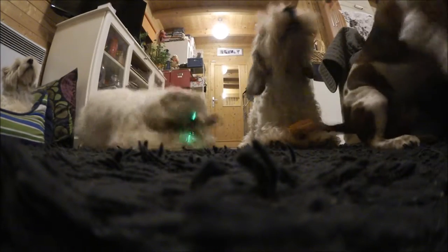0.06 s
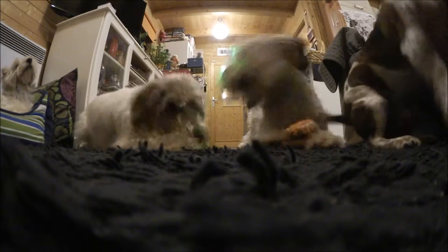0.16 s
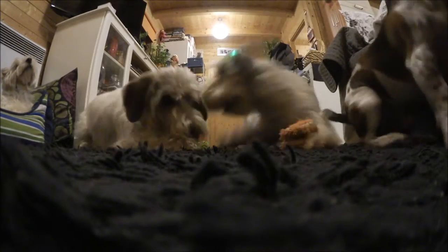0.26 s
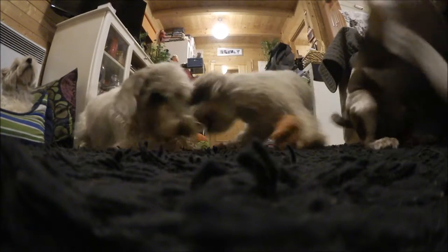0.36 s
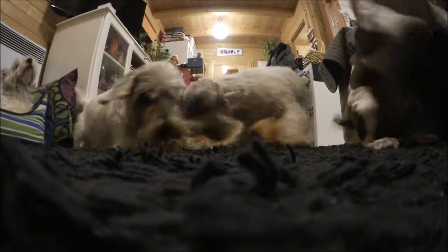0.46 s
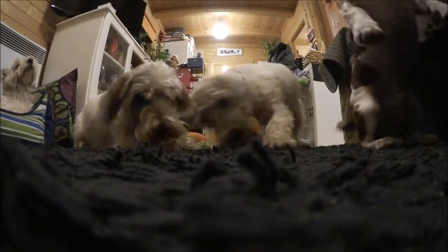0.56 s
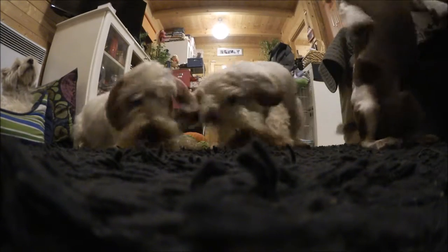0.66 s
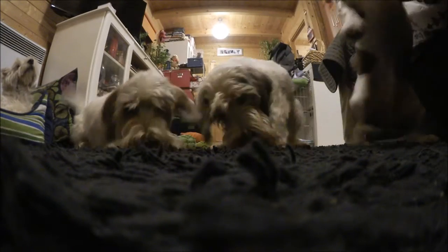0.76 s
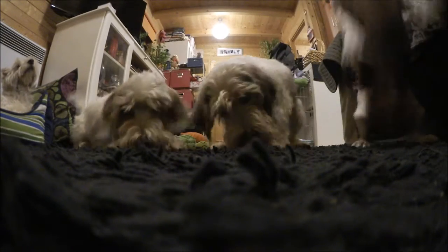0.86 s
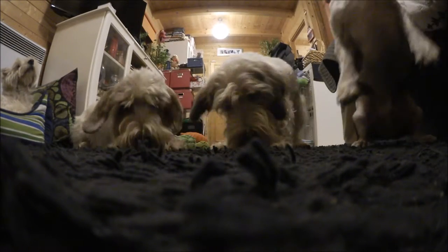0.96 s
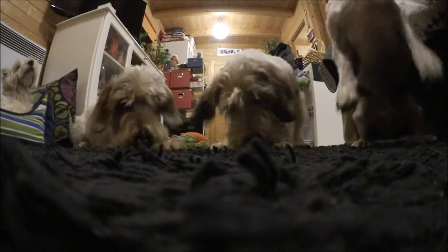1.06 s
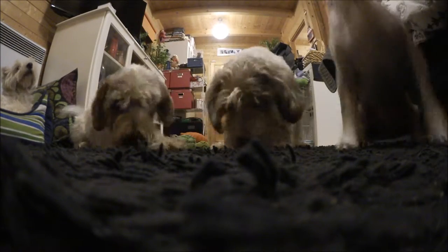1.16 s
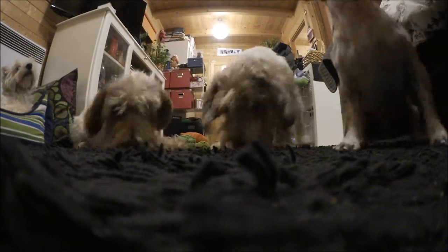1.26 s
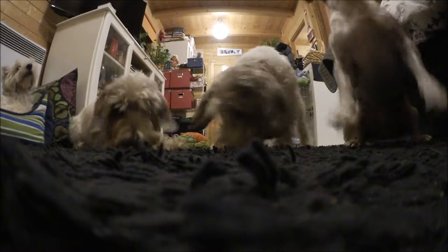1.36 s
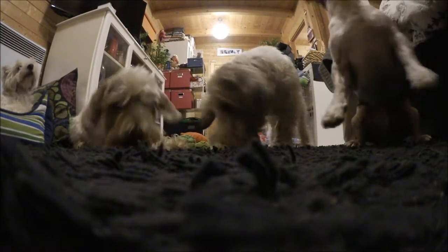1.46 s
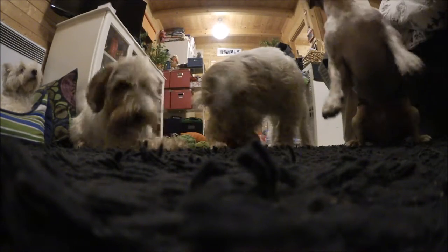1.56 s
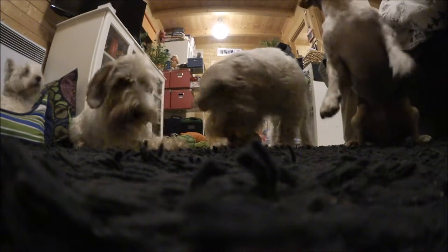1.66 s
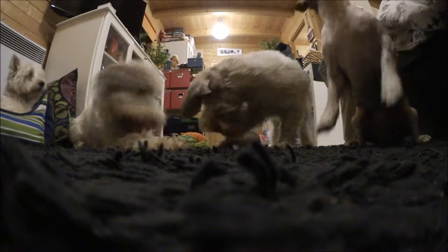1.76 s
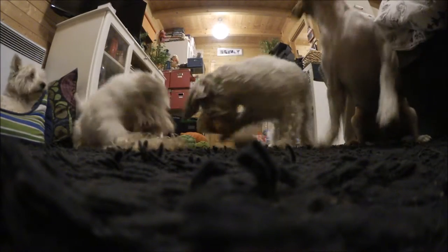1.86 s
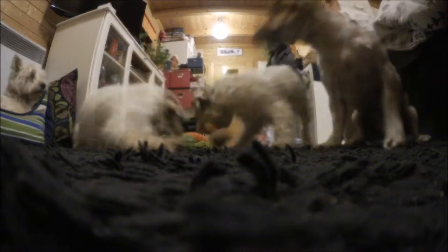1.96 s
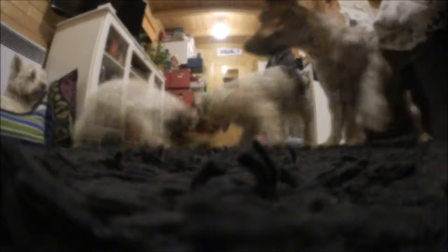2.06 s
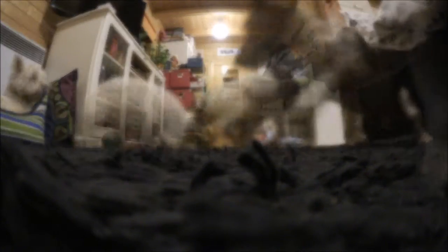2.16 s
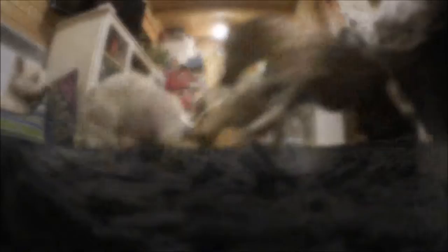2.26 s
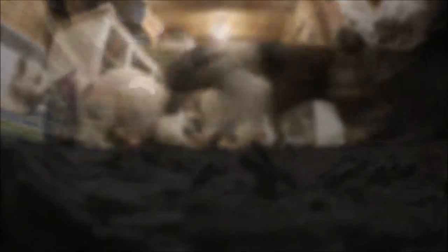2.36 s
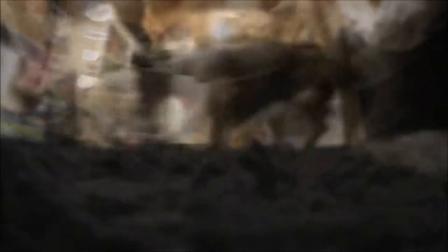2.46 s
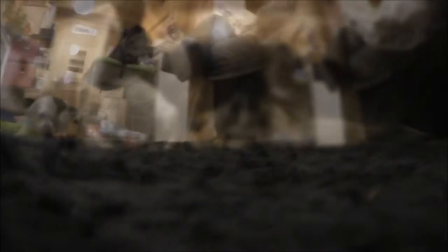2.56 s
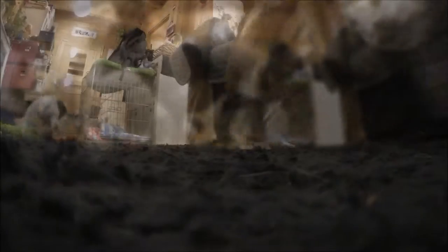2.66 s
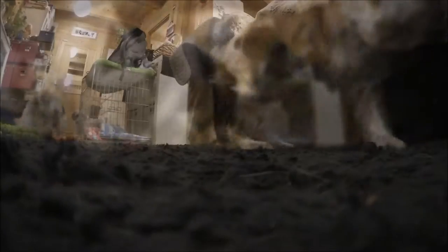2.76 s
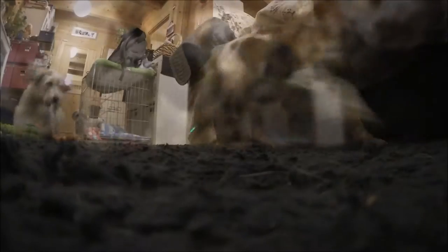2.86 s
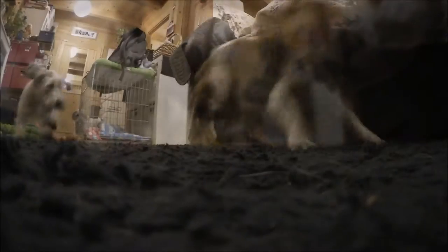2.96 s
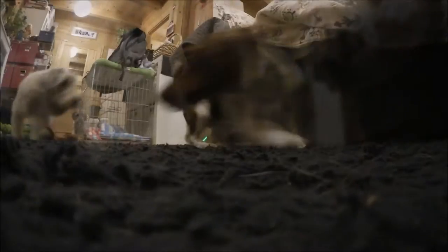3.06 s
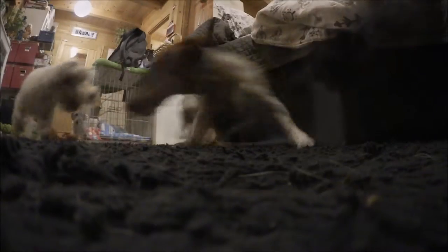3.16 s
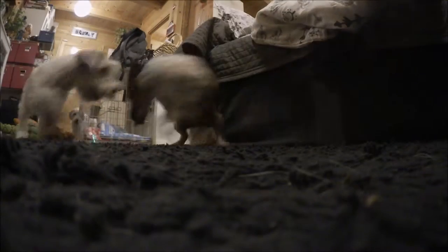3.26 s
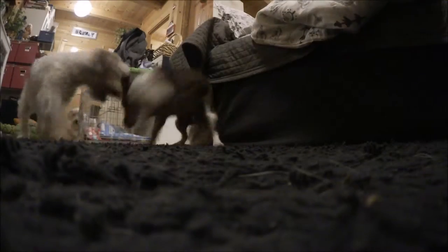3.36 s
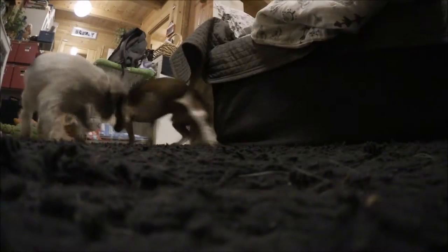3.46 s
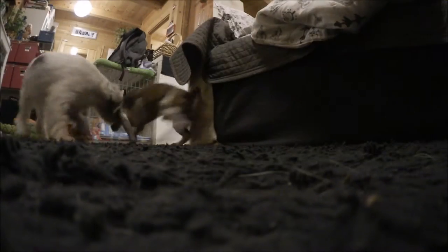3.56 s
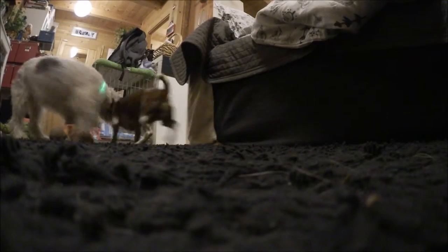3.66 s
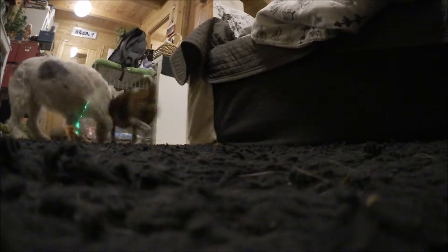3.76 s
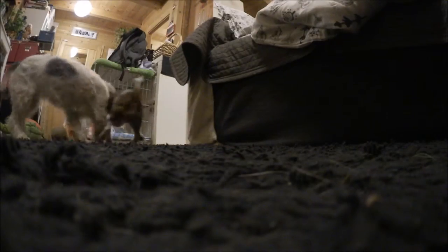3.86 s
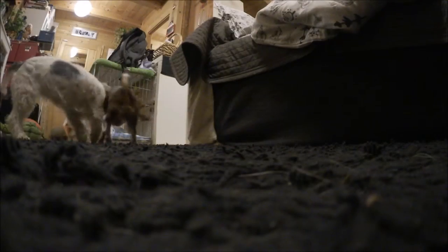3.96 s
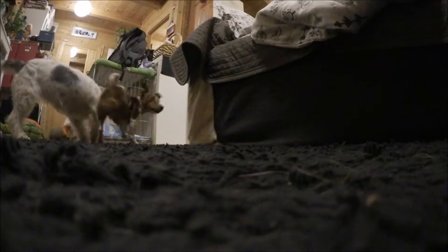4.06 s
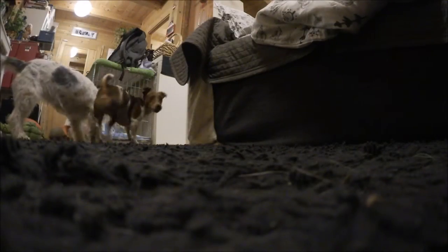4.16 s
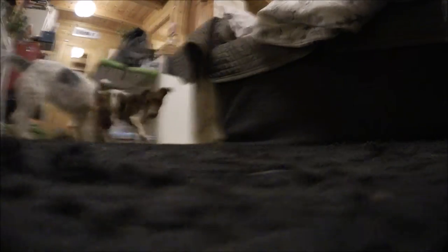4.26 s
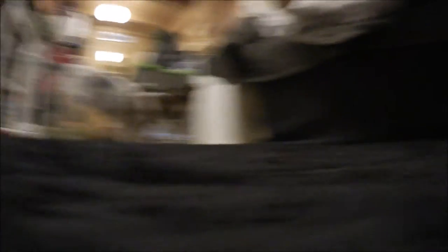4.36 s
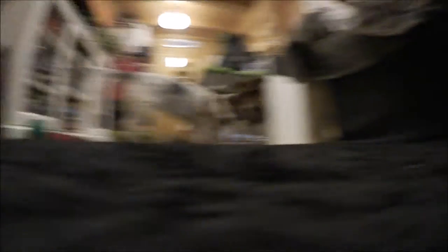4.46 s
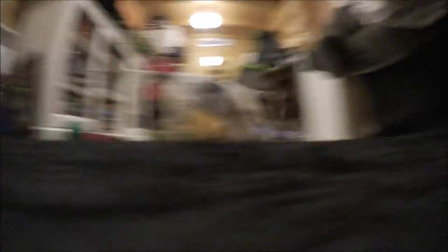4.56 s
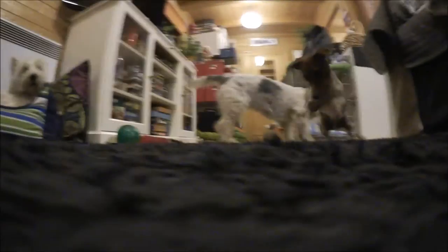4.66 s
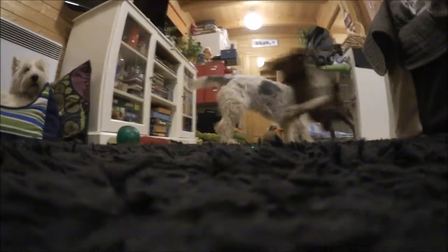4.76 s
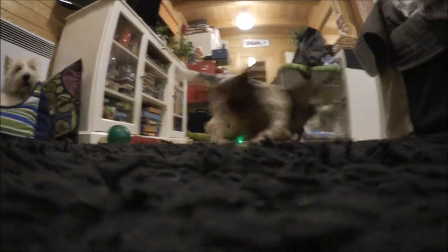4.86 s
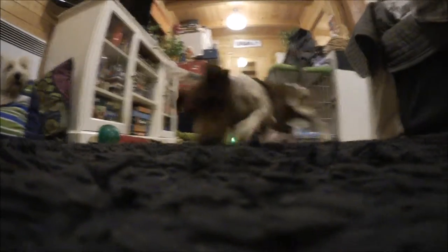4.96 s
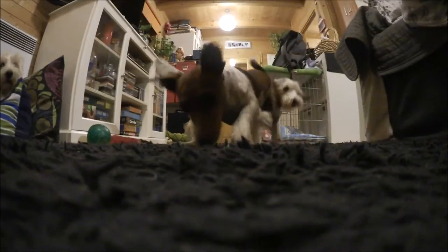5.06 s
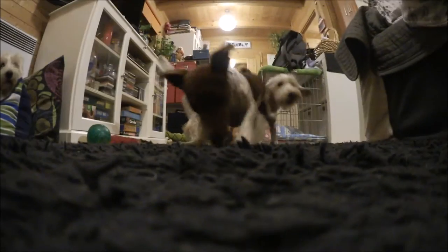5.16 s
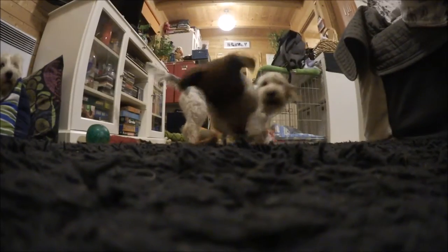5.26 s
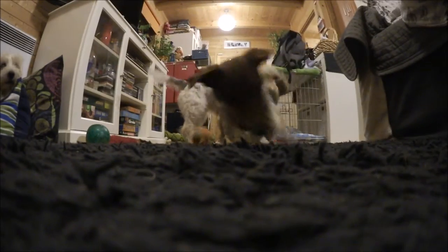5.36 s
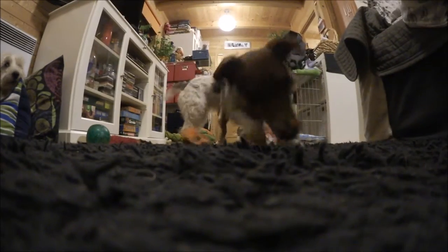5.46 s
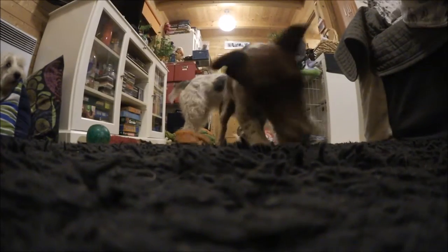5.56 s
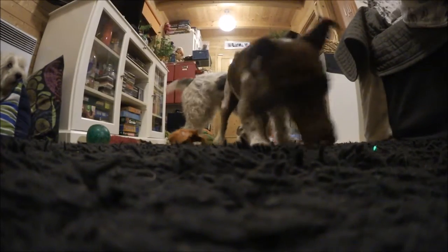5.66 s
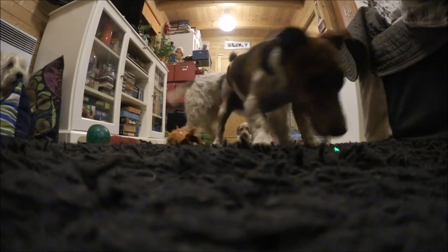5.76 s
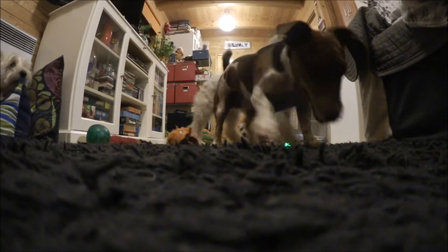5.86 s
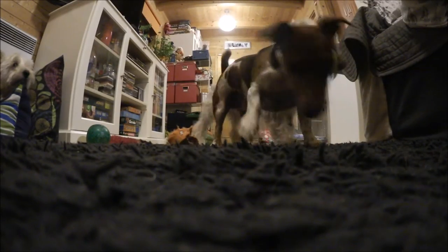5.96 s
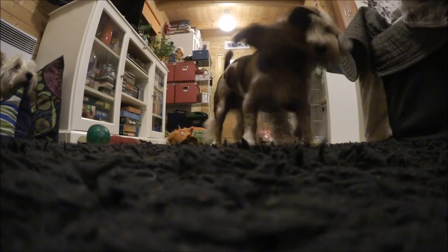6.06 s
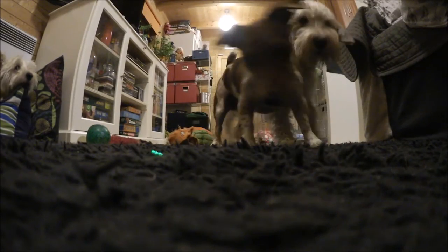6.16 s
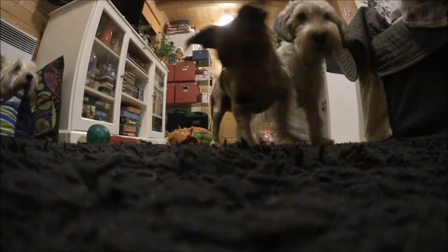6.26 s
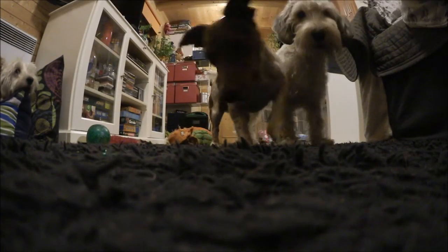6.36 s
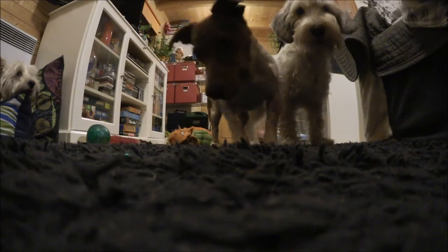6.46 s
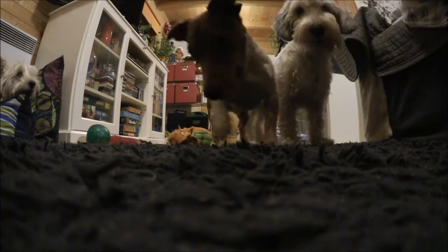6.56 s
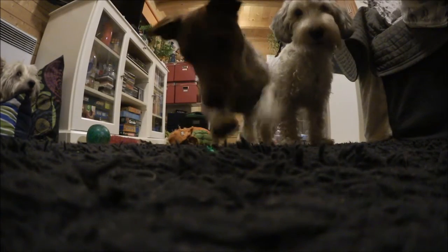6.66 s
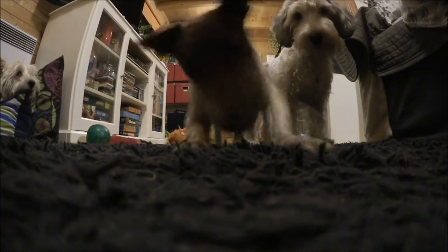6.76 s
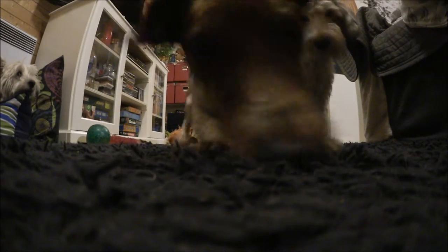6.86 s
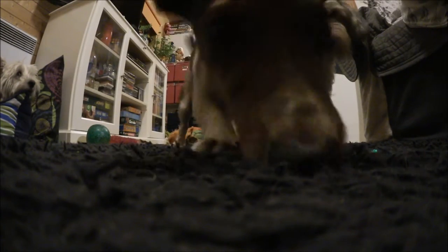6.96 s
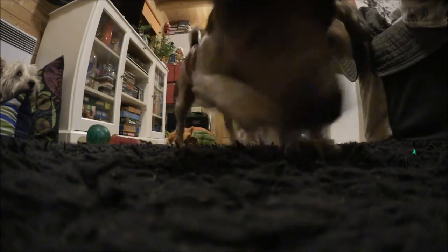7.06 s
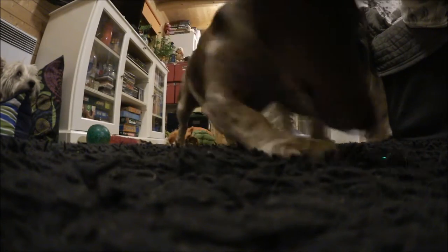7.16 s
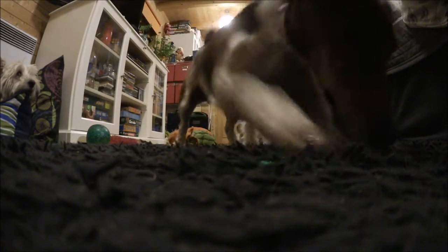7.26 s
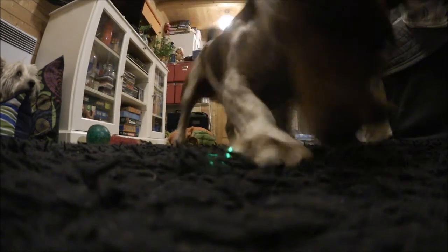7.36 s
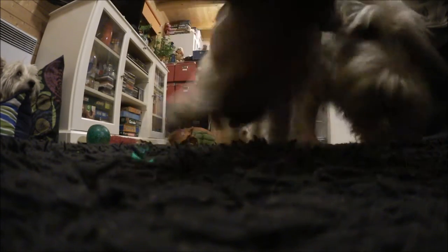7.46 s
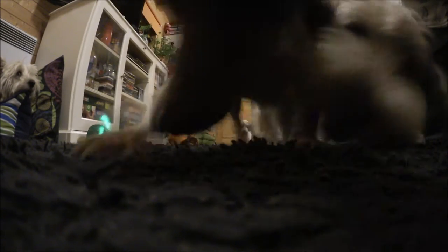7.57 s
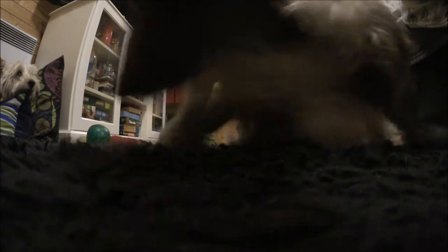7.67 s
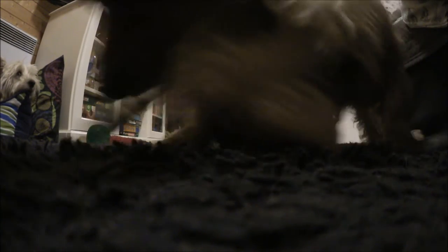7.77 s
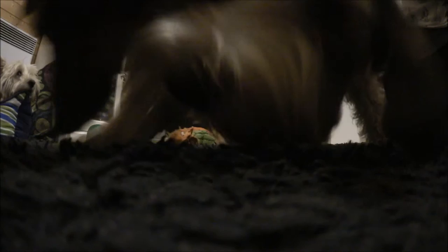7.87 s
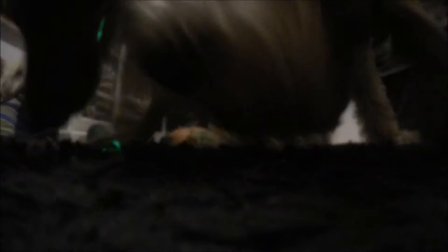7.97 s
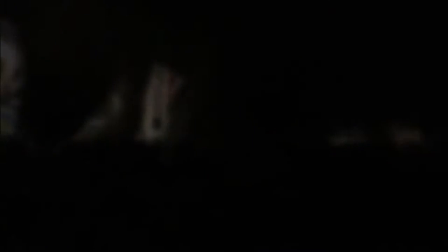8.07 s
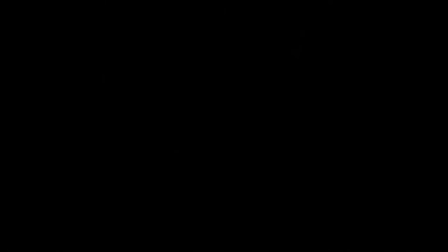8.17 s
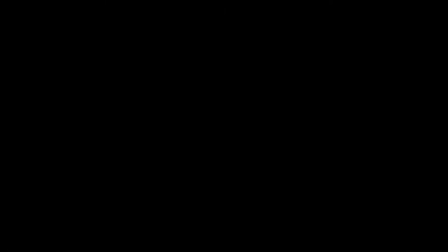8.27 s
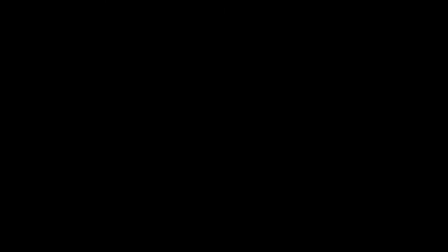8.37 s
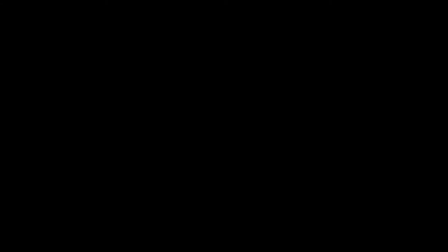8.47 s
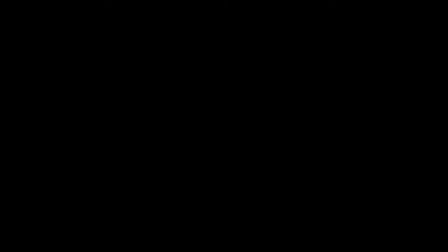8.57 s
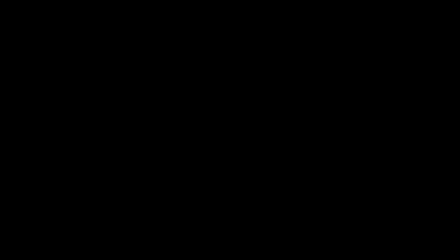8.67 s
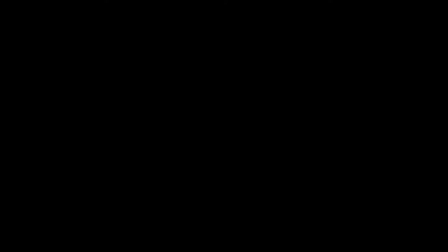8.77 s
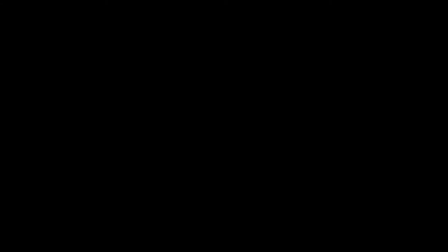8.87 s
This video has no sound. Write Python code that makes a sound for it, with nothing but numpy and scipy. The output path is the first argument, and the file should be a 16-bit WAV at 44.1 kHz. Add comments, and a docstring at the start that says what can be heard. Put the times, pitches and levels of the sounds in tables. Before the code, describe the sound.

A low microphone on a shaggy rug hears quiet air in a short, dull wooden room. A dark paw thump opens at 0 s, then soft shuffling, pressing feet and small hollow toy knocks run to about 2 s. From 2.2 to 2.5 s several hard thuds arrive with snapping pile, bright ticks and a harsh, ringing drag of the plastic case. Movement settles; a muted knock falls near 3.5 s, and a faint brushing of the case runs from 4.3 to 5 s. A firm thump at 4.9 s leads to short scuffs and claw snaps until 5.5 s. Very faint, hoarse high squeaks, perhaps a dog's, dot 5.6-6.3 s. Scuffing returns at 6.6 s, with a sharp snap near 6.9, and grows rough and close from 7.4 s. At 8.1-8.3 s snaps, ticks, knocks, thuds and case rubbing crowd together; sound stops at 8.5 s.

```python
"""Small dogs chase a light spot over a shaggy rug in a wood-lined room, heard from floor level.
Over quiet air, light shuffling noise swells and settles; paws thump the floor as dying low notes.
Feet scuff as grainy noise, jaws knock on a toy, claws pluck loops in short snaps, hairs tick on the case.
From 2.3 s, 4.3 s and 8.1 s the ringing microphone case is dragged or brushed with coloured noise.
Faint, hoarse high squeaks, perhaps a dog's, come from 5.6 to 6.3 s; the feet end close by, all stops at 8.52 s."""
import sys
import numpy as np
from scipy import signal
from scipy.fft import rfft, irfft, next_fast_len
from scipy.io import wavfile

SR = 44100
rng = np.random.default_rng(int(sys.argv[2]) if len(sys.argv) > 2 else 0)


def bounce(signal):
    """Save signal as a 16-bit WAV file at the path given by the first command-line argument."""
    frames = np.transpose(np.atleast_2d(signal))
    limited = np.clip(frames, -1, 1)
    pcm = np.round(limited * 32767).astype(np.int16)
    wavfile.write(sys.argv[1], SR, pcm)


N = 392931

# Table levels are relative: the functions below add their own trims.
# paws landing: [t/s, level/dB, boom f/Hz, floorboard level against boom/dB]
PAW_LANDINGS = [(0.022, -1.5, 123, -14), (0.303, -22.5, 150, -22), (0.632, -24.5, 148, -18),
                (1.38, -24.5, 134, -12), (1.999, -13.5, 157, -15.5), (2.185, -0.5, 256.6, -8),
                (2.281, 0.5, 261.4, -8.5), (2.365, -8.5, 199, -19), (2.426, -6, 136, -10.5),
                (2.517, -15.5, 177, -19), (2.775, -20, 199.6, -14.5), (2.928, -22.5, 172, -15),
                (3.147, -22, 185, -12), (3.385, -26, 172, -19), (3.61, -29, 171, -23),
                (3.685, -29, 199, -15), (4.14, -25, 132, -11.5), (4.635, -23, 167, -10),
                (4.86, -1, 152.5, -11), (4.911, -13, 149, -18), (5.187, -28, 161, -20),
                (6.784, -12, 153, -15.5), (7.24, -20.5, 121, -19), (7.347, -13, 215, -14),
                (8.214, -8, 277, -5.5), (8.267, -6, 183, -12.5), (8.311, -7.5, 182, -9)]
# jaws and toy knocking: [t/s, level/dB, hollow f/Hz, clack level against body/dB]
TOY_KNOCKS = [(0.171, -21, 358, -10), (0.383, -23.5, 1170, -5), (0.704, -15.5, 448, -6.5),
              (0.86, -28.5, 1190, -16), (0.922, -14, 855, -9), (1.406, -17.5, 447, -9.5),
              (1.606, -11.5, 333, -12.5), (2.049, -21, 1166, -15), (3.458, -9.5, 550, -24),
              (3.859, -24, 356, -20.5), (4.774, -18, 248, 0.5), (8.128, -15, 670, -18.5),
              (8.219, -9, 700, -25), (8.27, -3.5, 254, -13.5), (8.315, -9, 745, -19)]
# claws plucking loops of the pile: [t/s, level/dB]
CLAW_SNAGS = [(0.174, -25.5), (2.2791, -7), (2.2962, -8.5), (2.4015, -14), (2.836, -22.5), (3.1652, -20),
              (3.289, -21.5), (3.458, -15.5), (4.9452, -15.5), (4.9676, -14), (5.2607, -9), (5.2861, -12.5),
              (5.4474, -9.5), (5.5233, -26), (5.5398, -17.5), (6.7285, -19.5), (6.871, -3.5), (7.3838, -13),
              (7.4293, -8.5), (7.5403, -22.5), (7.6825, -4.5), (7.9159, -3), (8.1091, -17.5), (8.1559, -11),
              (8.1708, -1), (8.1772, -1)]
# hairs and tufts flicking the case: [t/s, level/dB]
HAIR_FLICKS = [(0.173, -28), (2.3142, -2.5), (2.3296, 3), (2.3417, -7), (2.3994, -8.5), (2.889, -19.5),
               (6.8878, -16), (7.095, -33), (7.5393, -31), (7.9418, -19.5), (7.9851, -13), (8.0022, -16),
               (8.0476, -15), (8.2054, -8.5), (8.2322, -6), (8.2725, 3.5), (8.4636, -15.5)]
# paws and fur stroking the pile: [peak t/s, length t/s, rasp level/dB, pressure level/dB]
PILE_STROKES = [(0.212, 0.073, -41.5, -1), (0.741, 0.1, -34, 4.5), (0.44, 0.19, -47.5, -4),
                (.98, 0.29, -42, -1), (1.223, 0.14, -41.5, -3), (1.435, .12, -37, 6),
                (1.537, 0.29, -44.5, 5.5), (2.1, 0.43, -37.5, -8.5), (2.29, 0.035, -16.5, 2.5),
                (2.65, 0.13, -39.5, -2), (3.013, 0.092, -34.5, -13.5), (3.169, 0.053, -32, 6.5),
                (3.425, 0.32, -41, -4.5), (4.164, .1, -50, 15), (4.931, 0.19, -32.5, 4.5),
                (5.188, 0.11, -42.5, -9), (5.284, .075, -26, 1.5), (5.453, 0.074, -25.5, -3),
                (5.543, 0.061, -33, 1.5), (6.63, 0.075, -35.5, -10), (6.789, 0.17, -30, -3.5),
                (6.882, 0.044, -17, 1), (6.942, 0.069, -27.5, -6.5), (7.143, .16, -38.5, 0),
                (7.29, 0.095, -32, -2.5), (7.375, 0.08, -28.5, 1), (7.456, 0.06, -12.5, -1),
                (7.698, 0.13, -14, -2.5), (7.762, 0.012, -32.5, -17), (7.832, 0.035, -28, 1.5),
                (7.928, 0.07, -16.5, 1), (8.009, 0.067, -28.5, 1.5), (8.116, .054, -19, 0),
                (8.184, 0.087, -13, 0), (8.312, 0.062, -17, -2.5), (8.425, 0.07, -41, -0.5),
                (8.467, .022, -28, 6)]
# case dragged or brushed: [start t/s, length t/s, level/dB, fastest moment as a share of the length]
CASE_DRAGS = [(2.279, 0.069, -21, 0.29), (2.37, 0.045, -23, 0.31), (2.397, 0.21, -34, 0.36),
              (4.276, 0.775, -41.5, 0.36), (8.068, 0.3, -37.5, 0.34)]
# faint high squeaks: [start t/s, middle f/Hz, level/dB]
FAINT_SQUEAKS = [(5.59, 2740, -47), (5.858, 2730, -51), (6.068, 2750, -55), (6.25, 2700, -57),
                 (6.307, 2810, -51)]
# floorboard notes, varied a little at each landing: [f/Hz, level/dB, time to fall 60 dB t/s]
FLOORBOARDS = [(245.5, -4.5, 0.1), (386, 4, 0.04), (424.5, -5.5, 0.064), (519, -8.5, 0.045),
               (809, -16.5, 0.046)]
# resonances of the microphone case: [f/Hz, width f/Hz, level/dB]
CASE_RINGS = [(2400, 280, -6), (2990, 350, 6.5), (4220, 300, -6), (5100, 230, -7), (6200, 300, -22.5)]
# spectrum of a paw's weight on the pile: [f/Hz, level/dB per Hz]
WEIGHT_SPECTRUM = [(25, -40.5), (60, -12), (110, 1.5), (180, 2.5), (330, -0.5), (600, -12), (1000, -23),
                   (2000, -42)]
# spectrum of the rasping pile: [f/Hz, level/dB per Hz]
RASP_SPECTRUM = [(200, -28), (500, 5), (900, 2.5), (1600, 1), (2700, -2), (3800, -11.5), (6000, -32),
                 (12000, -31)]
# spectrum of hissing single hairs: [f/Hz, level/dB per Hz]
HISS_SPECTRUM = [(2000, -18), (3500, 11), (6000, 4), (8500, -0.5), (11000, -4.5), (13000, -11.5),
                 (16000, -16.5)]
# spectrum of tufts rubbing the case, before it rings: [f/Hz, level/dB per Hz]
FRICTION_SPECTRUM = [(300, -24), (1000, 3), (2000, 4), (3300, -1), (5000, -5.5), (8000, -7), (11000, -8.5),
                     (13000, -13.5), (16000, -28.5)]
# spectrum of light steps: [f/Hz, level/dB per Hz]
STEP_SPECTRUM = [(25, -33), (55, -15.5), (90, -2.5), (160, 0.5), (260, -3.5), (420, -7), (700, -14.5),
                 (1500, -38.5)]
# spectrum of rubbing fur: [f/Hz, level/dB per Hz]
FUR_SPECTRUM = [(250, -19.5), (550, -6), (1200, -0.5), (2600, -5), (3600, -19), (7000, -18), (14000, -29.5)]
# spectrum of the steady air: [f/Hz, level/dB per Hz]
AIR_SPECTRUM = [(18, -44), (30, -19), (98, -3), (266, -4.5), (461, 1.5), (780, -7.5), (2610, -9.5),
                (7270, -16), (13700, -23), (16000, -33.5)]
# bouts of shifting about: [start t/s, end t/s, level/dB]
SHUFFLE_BOUTS = [(0, 1.74, -49), (2.03, 3.2, -39), (3.35, 3.57, -51), (4.601, 5.45, -52.5),
                 (6.72, 7.04, -45.5), (7.549, 8.2, -42.5)]
# how near the dogs are to the microphone: [t/s, closeness 0-1]
NEARNESS = [(2.2, 0.1), (2.38, 1), (2.7, 0), (6.9, 0.03), (7.45, 0.5), (8.5, 0.66)]
# their side as they cross in front of it: [t/s, left level against right/dB]
SIDE = [(6.9, -1), (7.42, -2.5), (7.7, 2), (7.93, 4), (8.15, -0.5), (8.5, -5)]

AIR_DB = -57
ROOM_T60_S, WALL_CUT_HZ = 0.17, 6000
STOP_S, CUTOFF_HZ = 8.52, 16800
T = np.arange(N) / SR
HIT = T[:SR // 4]   # time within one blow, s
# every stroke swells and fades about alike, in proportion to its length
STROKE_S, SWELL_S, SWELL_GROWTH = 0.069, 0.037, 0.99
# pressing harder adds weight and smothers the hair hiss; closeness brings the hiss out
HAIR_DB, HAIR_LOSS_DB_PER_DB, HAIR_NEAR_DB = -21.5, 1.22, 7.5
# how fast a bout builds and dies; what still stirs at rest
SETTLE_DB_PER_S, FIDGET_DB = 86, -62
# loss a whole length away from the fastest moment; how sharply a drag starts and stops
DRAG_EASE_DB, DRAG_EDGE_DB_PER_S = 19, 1501
SQUEAK_S = 0.039
PAW_NEAR_DB = 9   # extra shudder from a paw landing right beside the case


def from_db(db):
    """Turn decibels into a gain."""
    return 10 ** (np.asarray(db) / 20)


def rms_one(x):
    """Scale to an average strength (rms) of 1."""
    return x / np.sqrt(np.mean(x ** 2) + 1e-20)


def peak_one(x):
    """Scale the highest peak to 1."""
    return x / (np.abs(x).max() + 1e-20)


def add(track, s, sound):
    """Mix a sound into a track at time s."""
    at = max(0, int(s * SR))
    track[..., at:at + sound.shape[-1]] += sound[..., :N - at]


def in_time(curve):
    """A control curve at every sample."""
    return np.interp(T, *np.transpose(curve))


def outside(start, end):
    """Seconds before a start or after an end; 0 in between."""
    return np.maximum(np.maximum(start - T, T - end), 0)


def band(x, low_hz, high_hz, order=2):
    """Keep only the pitches between two limits."""
    limits = [low_hz, min(high_hz, .45 * SR)]
    return signal.sosfilt(signal.butter(order, limits, "band", fs=SR, output="sos"), x)


def colour(x, spectrum):
    """Filter a steady sound through a spectrum with sloping outer edges; rms 1."""
    size = next_fast_len(N)
    hz, db = np.transpose(spectrum)
    f = np.maximum(np.fft.rfftfreq(size, 1 / SR), 1)
    skirts = np.minimum(f / hz[0], 1) ** 2 * np.minimum(hz[-1] / f, 1) ** 2
    gain = skirts * from_db(np.interp(np.log(f), np.log(hz), db))
    return rms_one(irfft(rfft(x, size) * gain, size)[..., :N])


def ports(pair, alike):
    """Two unrelated signals become left and right microphone ports with a given likeness (0-1)."""
    alike = np.clip(alike, 0, 1)
    shared = np.sqrt(1 + alike) * pair[0]
    opposed = np.sqrt(1 - alike) * pair[1] * np.array([[1], [-1]])
    return (shared + opposed) / np.sqrt(2)


def flutter(rate, depth_db):
    """A gain that wanders to a new random value so many times a second, within 1.7 times the depth."""
    return from_db(depth_db * np.interp(T * rate, np.arange(4000), rng.uniform(-1.7, 1.7, 4000)))


def fibres(per_s, spread_db, alike, patchy_db=2.0, count=11):
    """Fibres slip at random: grains of uneven size, dealt to narrow bands that flare up on their own."""
    edges = np.geomspace(150, 15800, count + 1)
    edges[0] = 30
    out = np.zeros((2, N))
    for low, high in zip(edges, edges[1:]):
        at, size, sign = rng.random((3, 2, 100000))
        slips = int(np.clip(per_s * N / SR, 1, at.shape[1]))
        grains = from_db(-spread_db * np.log(np.maximum(size, .02))) * np.sign(sign - .5)
        clicks = [np.bincount((at[side, :slips] * N).astype(int), grains[side, :slips], N)
                  for side in range(2)]
        grain_band = band(np.array(clicks) + 1e-18, low, high, order=3)
        apart = min(1, (high / 380) ** 2)   # long waves reach both ports alike
        out += flutter(50, patchy_db) * ports(grain_band, 1 - (1 - alike) * apart)
    return out


def dying(t60):
    """A gain that falls 60 dB in t60 seconds."""
    return from_db(-60 * HIT / t60)


def mode(hz, t60):
    """One natural note of a struck thing, dying away."""
    return np.sin(2 * np.pi * hz * HIT) * dying(t60)


def burst(low_hz, high_hz, t60, alike, order=2):
    """A dying crunch of contact noise in a band; peak 1."""
    noise = ports(rng.standard_normal((2, len(HIT))), alike)
    return peak_one(band(noise * dying(t60), low_hz, high_hz, order=order))


def room_air():
    """Steady random noise, coloured as the quiet air and partly alike at both ports."""
    return from_db(AIR_DB) * colour(ports(rng.standard_normal((2, N)), alike=0.61), AIR_SPECTRUM)


def shuffle(rumble_db=-2, rustle_db=-6.5):
    """Light steps and rubbing fur are grainy noise, both following how busy the dogs are."""
    bouts = [from_db(db - SETTLE_DB_PER_S * outside(start, end)) for start, end, db in SHUFFLE_BOUTS]
    busy = from_db(FIDGET_DB) + np.max(bouts, axis=0)
    steps = from_db(rumble_db) * flutter(25, 6.4) * colour(fibres(450, 2.8, alike=1.0), STEP_SPECTRUM)
    fur = from_db(rustle_db) * flutter(22, 5.5) * colour(fibres(900, 2.9, alike=.5), FUR_SPECTRUM)
    return busy * (steps + fur)


def paws(close, boom_t60=0.066, board_db=3, pad_hz=850, press_s=0.0026, shudder_db=-15, level_db=-1):
    """A soft pad presses down and drives the floor's boom and boards; near ones shake each port on its own."""
    out = np.zeros((2, N))
    for s, db, hz, knock_db in PAW_LANDINGS:
        near = np.interp(s, T, close)
        boards = sum(from_db(g + rng.normal(0, 1.7, (2, 1))) * mode(f * rng.uniform(0.9, 1.05), t60)
                     for f, g, t60 in FLOORBOARDS)
        blow = mode(hz, boom_t60) + from_db(knock_db + board_db) * boards
        blow = blow * np.minimum(HIT / press_s, 1)
        thump = peak_one(band(blow, 80, pad_hz))
        shudder = from_db(shudder_db + PAW_NEAR_DB * near) * burst(75, 480, 0.17, alike=1 - near)
        add(out, s + .003, from_db(db + level_db) * peak_one(thump + shudder))
    return out


def room(x):
    """Dense, dull reflections off wooden walls, different at each port."""
    t = T[:SR // 2]
    build_up = np.clip(t / .012, 0, 1)
    tail = rng.standard_normal((2, len(t))) * from_db(-60 * t / ROOM_T60_S) * build_up
    tail = band(tail, 100, WALL_CUT_HZ) * np.sqrt(2 * np.log(1000) / (ROOM_T60_S * SR))
    return signal.fftconvolve(x, tail, axes=1)[:, :N]


def snap(pluck_hz=1550, width_s=0.00029):
    """A loop lets go of a claw: a very short, smoothly rising and falling wave."""
    t = HIT[:SR // 200] - .0015
    return peak_one(np.sin(2 * np.pi * pluck_hz * t) * np.exp(-np.abs(t / width_s) ** 1.6))


def crackle(per_s=45, spread_db=1.5):
    """Small loops snapping at random."""
    clicks = (rng.random(N) < per_s / SR) * from_db(spread_db * rng.uniform(-2.5, 1.5, N))
    return signal.oaconvolve(clicks, snap(pluck_hz=1720, width_s=0.00025))[:N]


def scuffs(close, weight_db=-2.0, rasp_db=-3.5, crackle_db=4, bluntness=1.41):
    """Each stroke swells and fades: the paw's weight rumbles, the pile rasps and crackles, hairs hiss."""
    weight, rasp, hiss = np.zeros((3, N))
    for s, length, db, pressure_db in PILE_STROKES:
        swell = SWELL_S * (length / STROKE_S) ** SWELL_GROWTH
        fade = max(length - swell, length / 4)
        near = slice(max(0, int((s - 2 * swell) * SR)), int((s + 2 * fade) * SR))
        from_peak = np.maximum((s - T[near]) / swell, (T[near] - s) / fade)
        stroke = from_db(db - 20 * from_peak ** bluntness)
        weight[near] += stroke * from_db(pressure_db)
        rasp[near] += stroke
        hiss[near] += stroke * from_db(-HAIR_LOSS_DB_PER_DB * pressure_db)
    alike = (1 - close) ** 2   # up close, each port feels its own rumble
    slips = flutter(130, 5.7)   # the paw sticks and slips
    rumble = from_db(weight_db) * weight * colour(fibres(1200, 2.0, alike), WEIGHT_SPECTRUM)
    pile = from_db(rasp_db) * rasp * slips * colour(fibres(650, 2.24, alike=0.74), RASP_SPECTRUM)
    loops = from_db(crackle_db) * rasp * crackle()
    hair_gain = from_db(HAIR_DB + HAIR_NEAR_DB * close) * hiss * np.sqrt(slips)
    hairs = hair_gain * colour(fibres(3400, 6.4, alike=0.4), HISS_SPECTRUM)
    return rumble + pile + loops + hairs


def knocks(hollow_t60=0.038, crunch_db=1, clack_db=10, level_db=0):
    """A hollow note from the mouth, with a short crunch and a brighter clack of teeth on the toy."""
    out = np.zeros((2, N))
    for s, db, hz, bright_db in TOY_KNOCKS:
        body = mode(hz, hollow_t60) + from_db(crunch_db) * burst(280, 900, 0.039, alike=0.85, order=3)
        clack = from_db(bright_db + clack_db) * burst(890, 2730, 0.06, alike=0.58, order=5)
        add(out, s + .0015, from_db(db + level_db) * peak_one(body + clack))
    return out


def snags(level_db=1):
    """Claws pluck loops of the pile: separate snaps, each a little to one side."""
    out = np.zeros((2, N))
    for s, db in CLAW_SNAGS:
        side_db = rng.normal(0, 1.2) * np.array([[1], [-1]])
        add(out, s, from_db(db + level_db + side_db) * snap())
    return out


def housing(x, direct_db):
    """The small plastic case adds its resonances to whatever touches it."""
    rings = sum(from_db(db) * signal.lfilter(*signal.iirpeak(hz, hz / width, fs=SR), x + 1e-18)
                for hz, width, db in CASE_RINGS)
    return from_db(direct_db) * x + rings


def flicks(level_db=-1):
    """Hairs and tufts make very short, bright ticks that ring the case."""
    out = np.zeros((2, N))
    for s, db in HAIR_FLICKS:
        add(out, s + 0.0022, from_db(db + level_db) * burst(2000, 10000, 0.0059, alike=0.51, order=2))
    return housing(out, direct_db=0.5)


def drags(level_db=6.5):
    """The case jerks loose, speeds up, slows and stops; many tufts brush it, and it sings near 3 kHz."""
    speed = np.zeros(N)
    for s, length, db, fastest in CASE_DRAGS:
        ease_db = DRAG_EASE_DB * np.abs(np.clip((T - s) / length, 0, 1) - fastest)
        edge_db = DRAG_EDGE_DB_PER_S * np.minimum(outside(s, s + length), 1)
        speed += from_db(db - ease_db - edge_db)
    tufts = colour(fibres(7000, 2.6, alike=0.47, patchy_db=3.0), FRICTION_SPECTRUM)
    return from_db(level_db) * speed * rms_one(housing(tufts, direct_db=-4.5))


def squeaks(sag=0.085, waver=0.1):
    """Faint, hoarse high squeaks, perhaps a dog's: single tones that wobble and sag in pitch."""
    out = np.zeros((2, N))
    u = np.linspace(0, 1, int(SQUEAK_S * SR))   # progress through one squeak
    for s, hz, db in FAINT_SQUEAKS:
        wobble = np.interp(u, np.linspace(0, 1, 40), rng.standard_normal(40))
        pitch = hz * (1 + sag * (.5 - u) + waver * wobble)
        add(out, s, from_db(db) * np.sin(np.pi * u) * np.sin(2 * np.pi * np.cumsum(pitch) / SR))
    return out


def scene():
    """Paws, toy, feet and squeaks reverberate in the room; what touches the case stays dry."""
    close, pan_db = np.clip(in_time(NEARNESS), 0, 1), in_time(SIDE)
    air, moving = room_air(), shuffle()
    thumps = paws(close)
    feet = (scuffs(close) + snags()) * from_db(np.array([pan_db, -pan_db]) / 2)
    toy = knocks()
    touches = flicks() + drags()
    high = squeaks()
    # the nearer the dogs, the less room is heard on toy and feet
    to_room = from_db(-25.5) * thumps + from_db(-9.5) * toy * (1 - close)
    to_room = to_room + from_db(-14 - 7 * close) * feet + from_db(-8) * high
    return air + moving + thumps + feet + toy + touches + high + room(to_room)


def record(dry):
    """The loudest peaks are squashed, the sound fades quickly to its stop, the top is cut."""
    running = np.clip((STOP_S - T) / .02, 0, 1)
    rounded = dry / (1 + (dry / .85) ** 4) ** .25
    return signal.sosfilt(signal.cheby2(14, 70, CUTOFF_HZ, fs=SR, output="sos"), rounded * running)


dry = scene()
out = record(dry)
bounce(out)
```